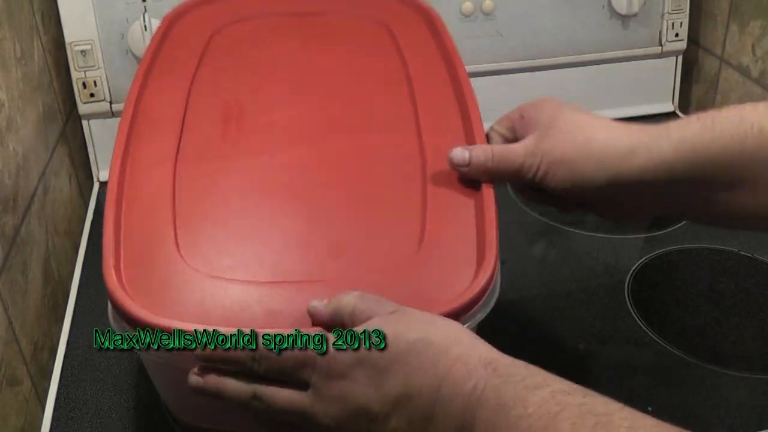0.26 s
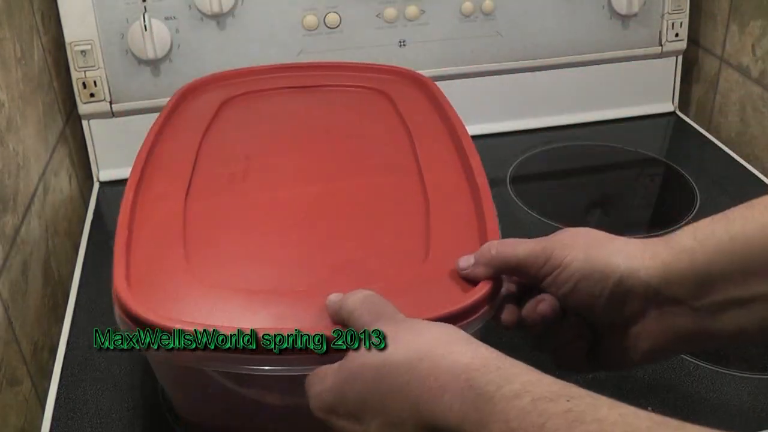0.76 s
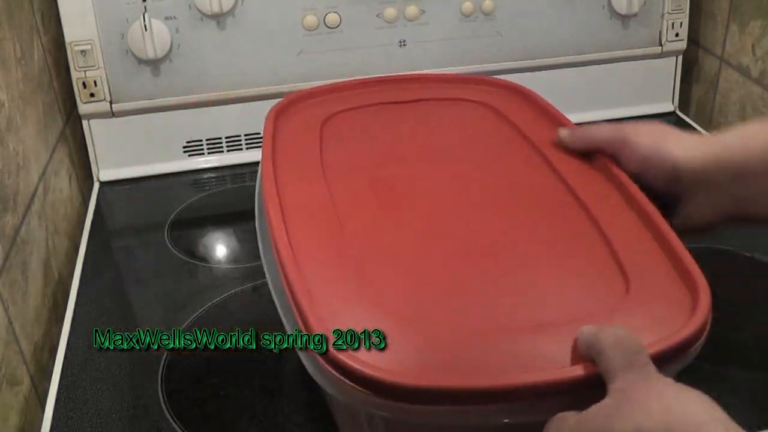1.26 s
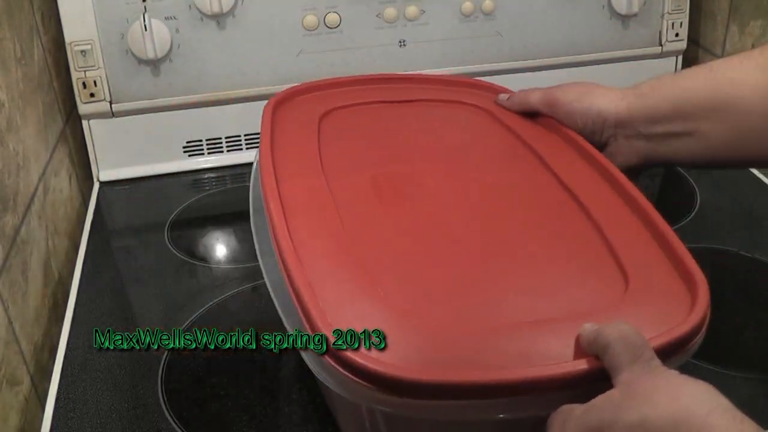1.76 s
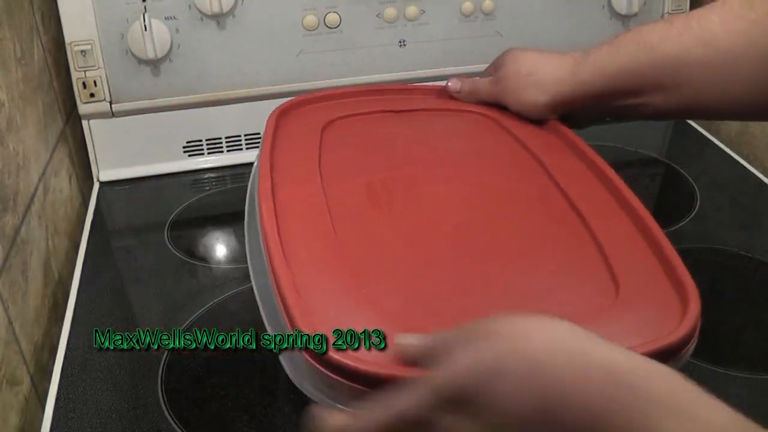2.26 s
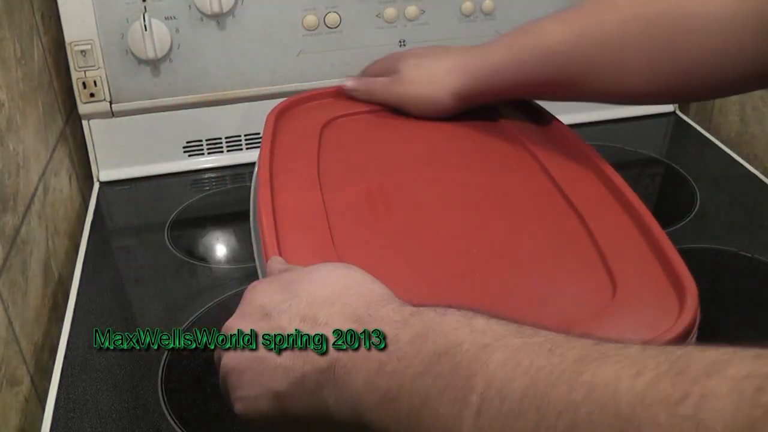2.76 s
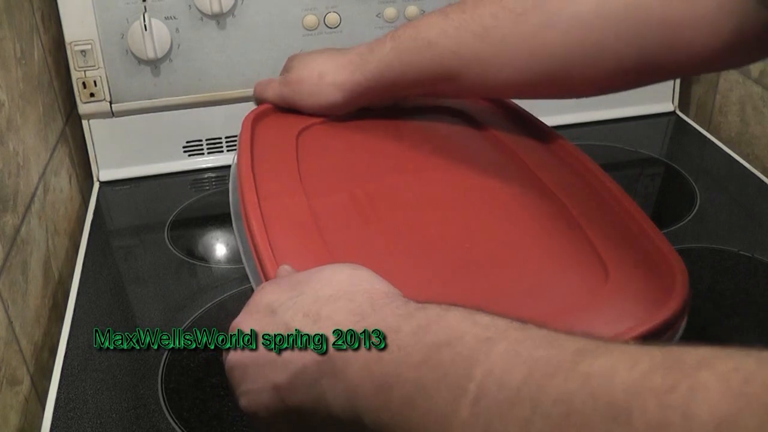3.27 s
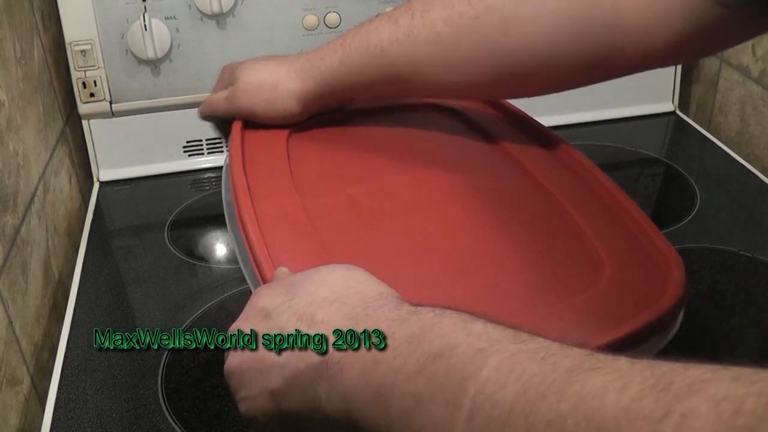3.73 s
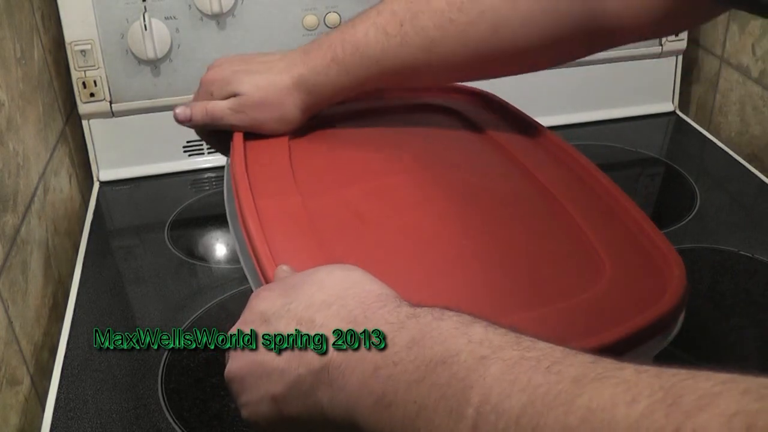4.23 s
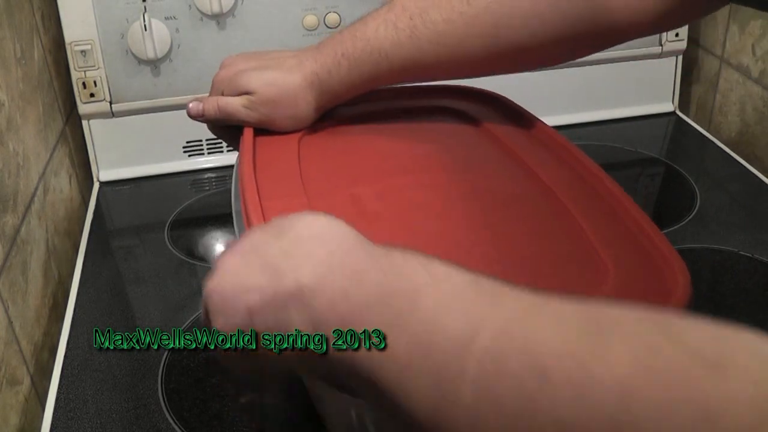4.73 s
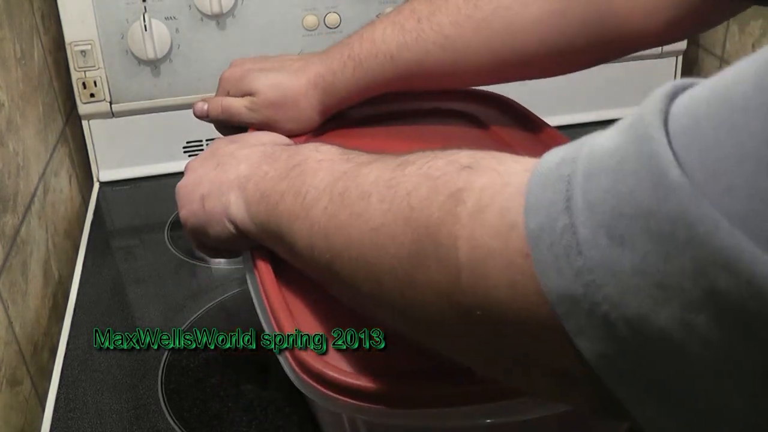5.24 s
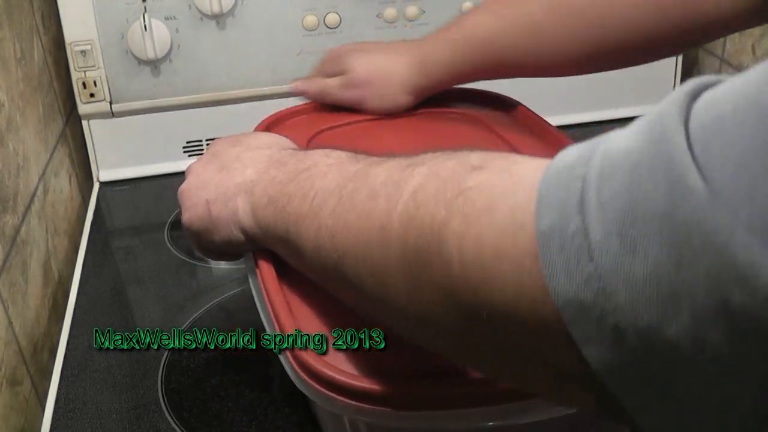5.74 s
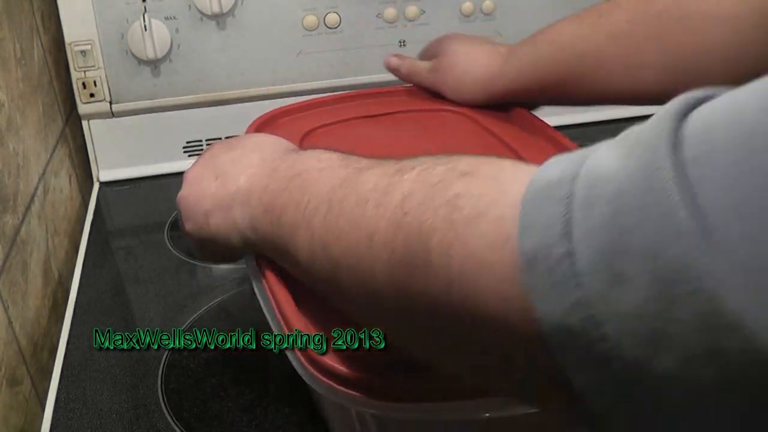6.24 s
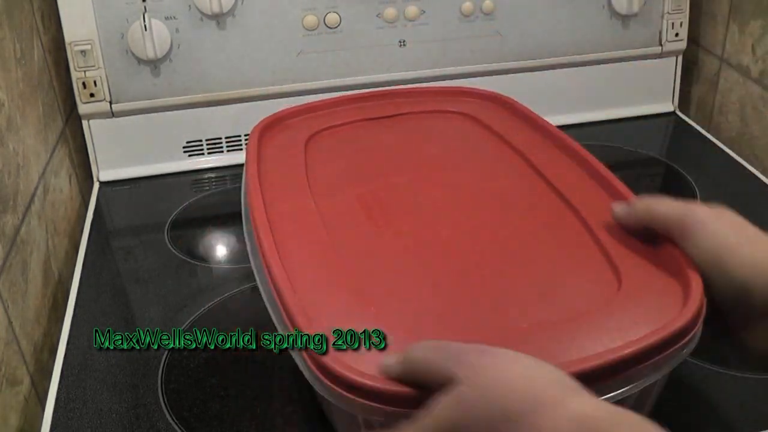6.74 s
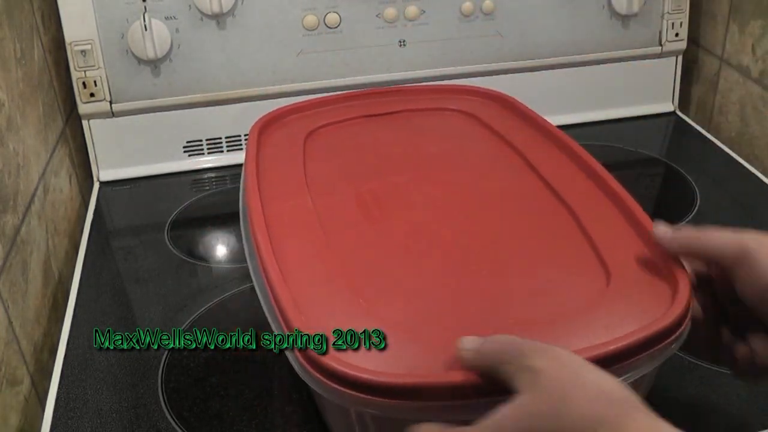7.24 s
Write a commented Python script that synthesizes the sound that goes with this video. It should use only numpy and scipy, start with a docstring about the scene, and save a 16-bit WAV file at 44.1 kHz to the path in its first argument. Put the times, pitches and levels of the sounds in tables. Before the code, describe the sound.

A plastic lid knocks on a big empty tub, hands hiss over it, the tub scrapes briefly, then the rim cracks shut in a quick run.

```python
"""Sharp knocks of a plastic rim are heard first, then hands hissing over a soft lid on a big empty tub.
The tub scrapes briefly on a glass stove top, the rim later snaps shut in a run of cracks, and the tub is set down.
Blows excite decaying modes of lid, walls and enclosed air; cracks are filtered bursts of noise.
Rubbing and scraping are trains of tiny random stick-slip releases, coloured by skin, plastic, walls and foot.
Two close microphone ports receive this with first reflections, a diffuse kitchen echo and faint steady noise."""
import sys
import numpy as np
from scipy import signal
from scipy.fft import rfft, irfft
from scipy.io import wavfile

SR = 44100
rng = np.random.default_rng(int(sys.argv[2]) if len(sys.argv) > 2 else 0)


def transcribe(signal):
    """Save signal, clipped to [-1, 1], as a 16-bit WAV file at the path in sys.argv[1]."""
    frames = np.atleast_2d(signal).T
    limited = np.clip(frames, -1, 1)
    pcm = np.round(limited * 32767).astype(np.int16)
    wavfile.write(sys.argv[1], SR, pcm)


N = 330655
TIME = np.arange(N) / SR  # seconds
AGE = np.arange(SR // 2) / SR  # seconds since a blow

# Source levels below are ahead of the mix in scene().
# steady room noise, relative spectrum: hz, level_db (per Hz)
KITCHEN_SPECTRUM = [(30, -17), (60, -1), (110, 5.5), (200, -3), (320, -1.5), (550, -4), (1300, -9),
                    (3000, -25), (7000, -45), (16000, -50)]
# decay of the kitchen echo: hz, t60_s
ROOM_DECAY = [(100, 0.42), (400, 0.41), (1500, 0.54), (3200, 0.49), (7000, 0.37), (15000, 0.33)]
# first reflections from the back panel and the wall: delay_s, level_db
FIRST_REFLECTIONS = [(.0057, -18.5), (0.0128, -22.5)]
# width of the sound at the two microphone ports: hz, side_minus_mid_db
PORT_WIDTH = [(30, -8), (110, -10.5), (260, -12.5), (700, -8), (1400, -10), (2800, -14), (5000, -53),
              (8000, -100), (10500, -20), (13000, -4), (16000, -10)]

# foot of the tub scraping on the glass, level against time: time_s, level_db
SCRAPE_LEVEL = [(.84, -77), (.91, -44.5), (1.0, -31.5), (1.04, -38), (1.11, -38), (1.17, -48.5),
                (1.24, -75)]
# relative spectrum of the foot's friction: hz, level_db
FOOT_SPECTRUM = [(150, -35), (380, -2), (520, 11.5), (750, -4), (950, 3), (1900, 0), (2500, -1),
                 (3300, -31), (6000, -33), (16000, -48)]
SCRAPE_DRAG_DB = 0.5  # drag of the plastic relative to the scraping foot

# relative spectrum of skin on the matt lid: hz, level_db (per Hz)
SKIN_SPECTRUM = [(600, -26), (1500, -10.5), (2500, -7), (2900, -2.5), (3400, -2), (4500, -3.5), (6800, -5),
                 (9500, -3.5), (12300, -4.5), (14500, -12), (15800, -17)]
# relative spectrum of dragged plastic: hz, level_db (per Hz)
DRAG_SPECTRUM = [(200, -19.5), (450, -13), (800, 2.5), (1300, 0.5), (1800, -2.5), (2300, -7), (2750, -5),
                 (3300, -5.5), (6000, -11), (16000, -23)]
# relative spectrum of walls shaken by rubbing: hz, level_db (per Hz)
SHUDDER_SPECTRUM = [(40, -34), (80, -14.5), (115, -6), (175, -5), (210, 6), (240, 2), (320, 0), (440, -5.5),
                    (530, -2.5), (800, -13.5), (2000, -41.5)]
# strokes of a hand: start_s, length_s, hiss_db, brightness_db (ahead of a common offset), extra_drag_db,
# speeding_share (fraction of the stroke spent speeding up)
HAND_STROKES = [(0.12, 0.37, -44.5, 2.5, 1, 0.26), (0.48, 0.27, -45.5, 2, -4, 0.19),
                (0.832, 0.47, -39.5, -7, -2, 0.39), (1.07, 0.37, -37, 1.5, 0.5, 0.56),
                (1.486, 0.092, -56.5, -17, 8.5, 0.16), (1.552, 0.24, -38.5, 2, -5.5, 0.32),
                (1.804, 0.12, -57.5, -18, 7, 0.37), (1.862, 0.31, -38.5, 2, -10, 0.38),
                (2.219, 0.2, -34.5, 7, 0, 0.52), (2.313, 0.8, -43, -5, -6, .15),
                (2.722, 0.31, -36, 1, 2.5, 0.38), (2.987, 0.32, -41, -0.5, 2.5, 0.21),
                (3.21, 0.2, -51.5, -8, -2, 0.56), (3.357, 0.18, -39.5, -1, -1, 0.22),
                (3.805, 0.096, -34.5, 3.5, 4, 0.77), (3.93, 0.16, -57.5, 1, -2, 0.26),
                (4.218, 0.18, -43, 0, -2.5, 0.67), (4.694, 0.44, -29.5, 2, 2, 0.53),
                (5.654, 0.28, -33.5, 2.5, 0.5, 0.8), (5.879, 0.2, -38, -2, -5.5, 0.42),
                (6.101, 0.21, -50.5, -1, 2, 0.57), (6.255, 0.62, -30, 1, -1, 0.3),
                (6.62, 0.42, -38.5, 2.5, 1.5, 0.61), (7.232, 0.36, -47, 2.5, -6.5, 0.18)]
GRIP_S = 0.3  # the resting hiss of the hands reaches full power by this time
STROKE_CURVE = 1.63  # hiss amplitude grows as this power of hand speed
RESTING_DB, RESTING_BRIGHT_DB = -65, -1.5  # hiss of hands that only hold on
# Drag and shudder at a firm stroke, and the dB each gains per dB of hiss.
FIRM_STROKE_DB = -29
DRAG_DB, DRAG_GROWTH = -44, 0.42
SHUDDER_DB, SHUDDER_GROWTH = -50.5, 0.21
# Lid shifting round a blow: time constants, and its shudder and drag relative to the blow.
SHIFT_BUILD_S, SHIFT_SETTLE_S, SHIFT_SHUDDER_DB, SHIFT_DRAG_DB = 0.007, 0.017, -6.5, -18.5
SEALING_S = 5.0  # blows from here on no longer make the lid shift

# modes of lid and walls: hz, level_db (relative), t60_s
LID_WALL_MODES = [(160.2, -13, 0.25), (206, -4, 0.16), (238, 0.5, 0.12), (262.7, -4, 0.15),
                  (318.5, -2.5, 0.1), (354.7, -1, 0.076), (406, -10, 0.088), (442, -5.5, 0.14),
                  (530, -5.5, 0.13), (603, -10.5, 0.22), (684, -6.5, 0.082), (790, 2, 0.04),
                  (976, -11.5, 0.2), (1104, -20, 0.053), (1320, -9.5, 0.084), (1480, -16.5, 0.13),
                  (1592, -23, 0.091), (2020, -24, 0.026)]
# lid bouncing on the enclosed air, longer once the rim is sealed: time_s, pitch_hz, t60_s
DRUM_MODE = [(0, 126, .1), (2.1, 111, .13), (5.2, 118, .14), (5.4, 118, .22), (7.05, 114, .22)]
# relative spectrum of a rim crack: hz, level_db
CRACK_SPECTRUM = [(100, -26), (500, -8.5), (900, 3), (1200, 3), (1900, 3.5), (2500, 1), (3100, 5),
                  (4200, 2), (7000, 2), (11000, 2.5), (16000, -6)]
# soft bumps of hands and lid: time_s, wall_db, favoured_wall_pitch_hz
SOFT_BUMPS = [(0.2354, -35, 328), (0.486, -32, 252), (0.562, -41, 240), (1.085, -31, 520),
              (1.158, -37, 276), (1.28, -32.5, 247), (1.363, -31.5, 273), (1.595, -45.5, 266),
              (1.728, -35, 240), (1.76, -41.5, 250), (1.903, -43, 240), (2.14, -34.5, 230),
              (2.279, -37, 247), (2.304, -30.5, 266), (2.381, -36.5, 225), (2.401, -38, 224),
              (2.516, -40, 197), (2.683, -31.5, 327), (2.981, -43.5, 210), (3.199, -34, 206),
              (3.226, -36, 210), (3.391, -37.5, 276), (4.222, -46, 350), (4.263, -45, 240),
              (5.439, -40.5, 420), (5.476, -40, 400), (6.187, -44.5, 310), (6.591, -40.5, 258),
              (6.776, -43.5, 227)]
# A bump near the stiff rim favours a higher pitch and is brighter (tilt at 250 Hz, and rise per octave).
BUMP_DRUM_DB, BUMP_TILT_DB, BUMP_TILT_RISE_DB = -16.5, 0.5, 3  # drum level is relative to the wall
# tub dropping back on the glass: time_s, drum_db, wall_db, wall_tilt_db (per octave), favoured_wall_pitch_hz,
# crack_db, crack_corner_hz, buzz_db (after the crack, relative to it, ahead of a common trim), left_minus_right_db
TUB_SET_DOWN = [(7.052, -23, -24.5, -2, 306, -26.5, 2630, -7, -3)]
# short piece of the lip ticking over: time_s, level_db
LIP_TICKS = [(3.6331, -31.5), (3.6609, -30)]
# modes of that piece: hz, level_db (relative to the tick), t60_s
LIP_PIECE_MODES = [(1174, -13, 0.034), (1730, -4, 0.024), (3230, -2, .025), (3540, 3, 0.011)]
# rim knocking, catching or snapping: time_s, crack_db, crack_corner_hz, buzz_db (after the crack, relative
# to it, ahead of a common trim), wall_db, drum_db, wall_tilt_db (per octave), favoured_wall_pitch_hz
RIM_SNAPS = [(0.0692, -33.5, 5400, -8, -35, -47, 1, 347), (0.1834, -36, 7500, -5, -28, -46, -0.5, 400),
             (0.1965, -25, 2000, -8, -19, -32, 1, 314), (0.342, -41, 7100, 0, -40, -52, 2, 327),
             (0.382, -43.5, 3600, -1, -44, -58, 5, 400), (0.436, -39, 7300, 0.5, -47, -59, 2, 248),
             (0.4453, -23, 7200, -10.5, -20.5, -37, -2, 257),
             (0.4671, -23, 5800, -11.5, -22.5, -40, -3.5, 256),
             (0.527, -30.5, 2200, -13.5, -25.5, -42, 0, 250), (2.013, -40, 1300, -9, -34.5, -61, -1, 516),
             (2.114, -29.5, 2200, -9, -22.5, -32, -3, 513), (2.5622, -41.5, 2580, -8, -39, -41, 12, 367),
             (2.593, -15.5, 2980, -14, -22.5, -33.5, 3, 347),
             (2.6633, -19, 4440, -3, -20.5, -28.5, -2, 350), (3.171, -37, 3540, -3.5, -30.5, -62, -5, 204),
             (3.358, -42, 5040, -6, -43.5, -65, 5, 340), (3.8197, -38.5, 5270, -16, -36.5, -64, -8, 266),
             (3.874, -30, 2680, -6.5, -31, -41, 3, 289), (3.946, -38, 2240, -4.5, -52, -58, 12, 200),
             (3.9562, -35.5, 3520, -9, -58, -56, 1, 200), (3.996, -32.5, 1780, -5.5, -32, -44, 2, 186),
             (4.583, -48.5, 7100, -2.5, -72, -67, 5, 210), (5.1686, -16, 2390, -19, -29.5, -29.5, 2.5, 227),
             (5.2161, -15, 5030, -14.5, -34, -35, 5, 312), (5.2742, -17, 3430, -14.5, -34.3, -39, -6, 367),
             (5.308, -13.5, 5700, -16.5, -26.5, -32.5, 6, 334),
             (5.394, -13, 3730, -15.5, -22, -29.5, -3.5, 472), (7.142, -45.5, 3640, -1, -63, -60, 3, 240),
             (7.347, -36.5, 7640, -12, -44, -75, 5.5, 257), (7.3684, -47.5, 5220, -0.5, -48, -75, 13, 345)]
RIM_PAN_DB = 1.5  # left minus right
TOP_HZ = 15900  # upper limit of the microphone


def undb(db):
    """Level: amplitude ratio is ten to the power of decibels over twenty."""
    return 10 ** (np.asarray(db) / 20)


def unit(x, size=None):
    """Normalization: scale to rms 1 as judged over the first size samples."""
    return x / np.sqrt(np.mean(x[:size] ** 2) + 1e-18)


def read(points, hz):
    """Interpolation: read a table along a logarithmic frequency axis."""
    f, value = np.transpose(points)
    return np.interp(np.log(hz + 1), np.log(f), value)


def bins(size):
    """Fourier analysis: bin frequencies of a real transform, in Hz."""
    return np.arange(size // 2 + 1) * SR / size


def response(db, size):
    """Minimum phase: a folded cepstrum gives the causal impulse response for the level at each bin."""
    cepstrum = irfft(np.log(undb(db)), size)
    cepstrum[1:size // 2] *= 2
    cepstrum[size // 2 + 1:] = 0
    return irfft(np.exp(rfft(cepstrum)), size)


def colour(x, points, size=2048):
    """Linear filtering: convolve with the response of a (hz, db) spectrum."""
    impulse = response(read(points, bins(size)), size)
    return signal.fftconvolve(x, impulse)[:len(x)]


def walk(rate):
    """Random modulation: straight lines between rate chance values a second, with a spread near 1."""
    knots = rng.standard_normal(4096)
    return 1.2 * np.interp(TIME * rate, np.arange(len(knots)), knots)


def add(track, s, sound):
    """Superposition: mix a sound into the track from time s."""
    i = max(int(s * SR), 0)
    part = sound[..., :N - i]
    track[..., i:i + part.shape[-1]] += part


def panned(sound, pan_db):
    """Level difference: place a sound between the two ports."""
    return undb([[pan_db / 2], [-pan_db / 2]]) * sound


def kitchen():
    """Stationary noise: white noise takes the spectrum of the quiet kitchen."""
    return unit(colour(rng.standard_normal(N), KITCHEN_SPECTRUM))


def room(x, first_s=0.0044, treble_db=-4):
    """Reverberation: octave bands of diffuse noise decay at the rates of a small hard kitchen."""
    centres = 62.5 * 2. ** np.arange(9)
    noise, hz, tail = rfft(rng.standard_normal(len(AGE))), bins(len(AGE)), 0
    for centre, weights in zip(centres, np.eye(len(centres))):
        overlap = np.interp(np.log(hz + 1), np.log(centres), weights)
        band = irfft(noise * overlap, len(AGE))
        tail = tail + band * np.exp(-np.log(1000) * AGE / read(ROOM_DECAY, centre))
    tail = tail * np.clip(AGE / first_s - 1, 0, 1)  # silent until first_s, full at twice that
    tail = tail / np.sqrt(np.sum(tail ** 2))
    tone = [(120, 0.0), (220, 2.0), (800, -1.0), (2000, -0.5), (3200, 0.5), (9000, treble_db)]  # Hz, dB
    return signal.fftconvolve(x, colour(tail, tone))[:N]


def side(mid, scatter_s=0.018):
    """Decorrelation: reflections reach the ports differently, as the same sound with scattered phase."""
    scatter = rng.standard_normal(len(AGE)) * np.exp(-AGE / scatter_s) * (1 - np.exp(-AGE / 0.0017))
    scatter = scatter / np.sqrt(np.sum(scatter ** 2))
    return colour(signal.fftconvolve(mid, scatter)[:N], PORT_WIDTH)


def ring(hz, t60):
    """Damped oscillation: one mode falls by 60 dB in t60 seconds."""
    return np.sin(2 * np.pi * hz * AGE) * np.exp(-np.log(1000) * AGE / t60)


def walls(tilt_db, favoured_hz, favour_db=7.5, favour_octaves=0.23, spread_db=3.56, detune=0.025):
    """Modal excitation: the place of a blow favours some modes; the grip shifts level and pitch by chance."""
    chance = rng.standard_normal((len(LID_WALL_MODES), 2))
    out = 0
    for k, ((hz, db, t60), (size, shift)) in enumerate(zip(LID_WALL_MODES, chance)):
        favour = favour_db * np.exp(-(np.log2(hz / favoured_hz) / favour_octaves) ** 2)
        tilt = tilt_db * min(np.log2(hz / 250), 2)  # no further tilt above 1000 Hz
        gain = undb(db + favour + tilt + spread_db * size)
        polarity = (-1) ** (k // 2)
        out = out + polarity * gain * ring(hz * (1 + detune * shift), t60)
    return out


def slips(rate, scatter_db):
    """Stick-slip friction: about rate tiny releases a second, of uneven size and either sign."""
    hit = rng.random(N) < rate / SR
    return hit * rng.standard_normal(N) * undb(scatter_db * np.minimum(rng.exponential(size=N), 5))


def scrape_db():
    """Friction level: the scraping foot's level over time, silent outside its table."""
    return np.interp(TIME, *np.transpose(SCRAPE_LEVEL), left=-np.inf, right=-np.inf)


def scrape(ringing_db=-2, tilt_db=5, favoured_hz=480):
    """Friction-driven resonance: slips of the foot sound directly and through the ringing walls."""
    friction = slips(3500, 1.9)
    ringing = unit(signal.fftconvolve(friction, walls(tilt_db, favoured_hz))[:N])
    direct = unit(colour(friction, FOOT_SPECTRUM))
    return undb(scrape_db()) * unit(direct + undb(ringing_db) * ringing)


def squeak(start_s=2.288, end_s=2.322, from_hz=6000, to_hz=7100, db=-35, octave_db=-8):
    """Frequency modulation: a fingertip whistles briefly upward, with an octave partial and jitter."""
    along = np.clip((TIME - start_s) / (end_s - start_s), 0, 1)
    glide = from_hz + (to_hz - from_hz) * np.sin(np.pi * along / 2)
    hz = glide * (1 + 0.0106 * walk(1600))
    phase = 2 * np.pi * np.cumsum(hz) / SR
    return undb(db) * np.sin(np.pi * along) * (np.sin(phase) + undb(octave_db) * np.sin(2 * phase))


def strokes():
    """Speed-dependent friction: arches of hand speed give hiss, brightness and extra drag in dB."""
    power = undb(RESTING_DB) ** 2 * np.clip(TIME / GRIP_S, 1e-2, 1)
    brightness, drag = power * RESTING_BRIGHT_DB, 0
    for start_s, length_s, db, bright_db, drag_db, speeding in HAND_STROKES:
        peak = np.clip(speeding, .1, .9)
        along = np.interp((TIME - start_s) / length_s, [0, peak, 1], [-1, 0, 1])
        speed = 1 - along ** 2
        stroke = (undb(db) * speed ** STROKE_CURVE) ** 2
        power = power + stroke
        brightness, drag = brightness + stroke * bright_db, drag + stroke * drag_db
    return 10 * np.log10(power), brightness / power, drag / power  # the last two are power-weighted means


def shifting():
    """Loose contact: until the rim seals, the lid shifts just before each snap or bump and settles after."""
    power = np.zeros(N)
    snap_levels = [(row[0], row[4]) for row in RIM_SNAPS]
    bump_levels = [row[:2] for row in SOFT_BUMPS]
    for s, wall_db in snap_levels + bump_levels:
        if s < SEALING_S:
            fade = np.maximum((s - TIME) / SHIFT_BUILD_S, (TIME - s) / SHIFT_SETTLE_S)
            power += undb(wall_db) ** 2 * np.exp(-2 * np.minimum(fade, 20))
    return np.sqrt(power)


def contact():
    """Power addition: strokes, shifting lid and scraping foot set hiss, brightness, drag and shudder in dB."""
    skin_db, bright_db, extra_drag_db = strokes()
    firmness_db, shift = skin_db - FIRM_STROKE_DB, shifting()
    foot = undb(scrape_db() + SCRAPE_DRAG_DB)
    stroke_drag = undb(DRAG_DB + extra_drag_db + DRAG_GROWTH * firmness_db)
    drag = np.hypot(stroke_drag, np.hypot(undb(SHIFT_DRAG_DB) * shift, foot))
    stroke_shudder = undb(SHUDDER_DB + SHUDDER_GROWTH * firmness_db)
    shudder = np.hypot(stroke_shudder, undb(SHIFT_SHUDDER_DB) * shift)
    return skin_db, bright_db, 20 * np.log10(drag), 20 * np.log10(shudder)


def sliding(drag_wander_db=3.0, mirror=0.29, mirror_s=0.000532, mirror_sway=0.296):
    """Sliding friction: skin hisses on the matt lid; firmer contact drags the plastic and shakes the walls."""
    skin_db, bright_db, drag_db, shudder_db = contact()
    skin = unit(colour(slips(20000, 0.52), SKIN_SPECTRUM))
    fine = signal.sosfiltfilt(signal.butter(2, 7000, "high", fs=SR, output="sos"), skin)
    bright = undb(bright_db - 3.5)  # common brightness offset
    skin = (skin - fine + bright * fine) / np.sqrt((1 + bright ** 2) / 2)
    drag = unit(colour(slips(5000, 1.0), DRAG_SPECTRUM))
    shudder = unit(colour(slips(900, 1.0), SHUDDER_SPECTRUM))
    hiss = skin * undb(skin_db + .5 * walk(45))
    rub = hiss + drag * undb(drag_db + drag_wander_db * walk(60))
    # The gap between hand and lid reflects the rub; its wandering delay shifts the colour.
    lag = mirror_s * np.exp(mirror_sway * walk(4.5))
    reflected = np.interp(TIME - lag, TIME, rub)
    rub = (rub + mirror * reflected) / np.sqrt(1 + mirror ** 2)
    return rub + shudder * undb(shudder_db + 2 * walk(25))


def tub(s, drum_db, wall_db, tilt_db, favoured_hz, rise_s=0.0023, first_swing=1, first_swing_s=0.0028):
    """Impact response: after a blow at time s the walls ring and the lid drums on the enclosed air."""
    # The bend needs time to cross the lid; its first swings are up to twice as wide as the later ones.
    swing = (1 - np.exp(-AGE / rise_s)) * (1 + first_swing * np.exp(-AGE / first_swing_s))
    times, drum_hz, drum_t60 = np.transpose(DRUM_MODE)
    drum = ring(np.interp(s, times, drum_hz), np.interp(s, times, drum_t60))
    wall = unit(walls(tilt_db, favoured_hz) * swing, size=1323)  # level over the first 30 ms
    return undb(wall_db) * wall + undb(drum_db) * unit(drum * swing, size=1323)


def crack(db, corner_hz, buzz_db, release_s=0.0012, buzz_s=0.01, buzz_gain_db=-2,
          slope=1.71, rim_db=2.0, rim_octaves=1.0, size=512):
    """Sudden release: the lip lets go in a few milliseconds and dense high modes of the plastic buzz on."""
    hz = bins(size)
    burst, buzz = rng.standard_normal((2, len(AGE)))
    burst = np.sign(burst) * np.exp(-AGE / release_s) * (1 - np.exp(-AGE / 0.00057))
    buzz = buzz * np.exp(-AGE / buzz_s) * (1 - np.exp(-(AGE / 0.0028) ** 2))
    # The freed length of rim resonates round the corner frequency.
    rim = rim_db * np.exp(-(np.log2((hz + 1) / corner_hz) / rim_octaves) ** 2)
    rolloff = 10 * np.log10(1 + (hz / corner_hz) ** (2 * slope))
    impulse = response(read(CRACK_SPECTRUM, hz) + rim - rolloff, size)
    burst = unit(signal.fftconvolve(burst, impulse)[:len(AGE)], size=176)  # first 4 ms
    buzz = unit(signal.fftconvolve(buzz, impulse)[:len(AGE)], size=1764)  # first 40 ms
    return undb(db) * (burst + undb(buzz_db + buzz_gain_db) * buzz)


def bump(s, wall_db, favoured_hz):
    """Soft impact: a slower rise of the walls with a little drumming, brighter at higher favoured pitches."""
    tilt_db = BUMP_TILT_DB + BUMP_TILT_RISE_DB * np.log2(favoured_hz / 250)
    return tub(s, wall_db + BUMP_DRUM_DB, wall_db, tilt_db, favoured_hz, rise_s=0.0057)


def set_down(s, drum_db, wall_db, tilt_db, favoured_hz, crack_db, corner_hz, buzz_db, pan_db):
    """Impact response: the tub lands on the glass with a drumming thump, kept above 90 Hz."""
    sound = tub(s, drum_db, wall_db, tilt_db, favoured_hz, rise_s=0.0047)
    sound = sound + crack(crack_db, corner_hz, buzz_db)
    high_pass = signal.butter(4, 90, "high", fs=SR, output="sos")
    return panned(signal.sosfilt(high_pass, sound), pan_db)


def tick(s, db, corner_hz=3000, crack_db=-4, buzz_db=-20, wall_db=-15, drum_db=-38, tilt_db=5, favoured_hz=310):
    """Local resonance: a piece of lip clicks and rings for a moment while the tub barely stirs."""
    lip = sum(undb(mode_db) * ring(hz, t60) for hz, mode_db, t60 in LIP_PIECE_MODES)
    body = tub(s, drum_db, wall_db, tilt_db, favoured_hz)
    return undb(db) * (lip + crack(crack_db, corner_hz, buzz_db) + body)


def snap(s, crack_db, corner_hz, buzz_db, wall_db, drum_db, tilt_db, favoured_hz,
         thud_hz=58, thud_t60_s=0.023, thud_db=-19):
    """Snap-through: the rim cracks, the tub rings, and the dropping lid thuds in proportion to the crack."""
    thud = undb(crack_db + thud_db) * ring(thud_hz, thud_t60_s)
    body = tub(s, drum_db, wall_db, tilt_db, favoured_hz)
    return panned(body + crack(crack_db, corner_hz, buzz_db) - thud, RIM_PAN_DB)


def blows():
    """Superposition of impacts: bumps, set-down, ticks and rim snaps at their times."""
    out = np.zeros((2, N))
    for rows, strike in (SOFT_BUMPS, bump), (TUB_SET_DOWN, set_down), (LIP_TICKS, tick), (RIM_SNAPS, snap):
        for row in rows:
            add(out, row[0], strike(*row))
    return out


def scene(blow_room_db=-10, slide_room_db=-11, slide_db=-1.0, kitchen_db=-57):
    """Sound field: direct sound, reflections and echo of every source over the kitchen's steady noise."""
    hits = blows()
    slide = undb(slide_db) * sliding() + squeak() + scrape()
    hits_mid = hits.mean(axis=0)
    echo = room(undb(blow_room_db) * hits_mid + undb(slide_room_db) * slide)
    for delay_s, db in FIRST_REFLECTIONS:
        add(echo, delay_s, undb(db) * (hits_mid + slide))
    both = hits + slide + echo + undb(kitchen_db) * kitchen()
    return both + np.array([[1], [-1]]) * side(both.mean(axis=0))


def record(dry, ceiling=0.34):
    """Saturation and band limits: the microphone rounds sharp peaks, thins deep bass and cuts the top."""
    rounded = ceiling * np.tanh(dry / ceiling)
    sound = signal.sosfilt(signal.butter(2, 35, "high", fs=SR, output="sos"), rounded)
    return signal.sosfilt(signal.ellip(10, .2, 80, TOP_HZ, fs=SR, output="sos"), sound)


dry = scene()
out = record(dry)
transcribe(out)
```